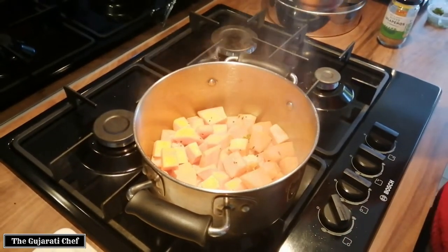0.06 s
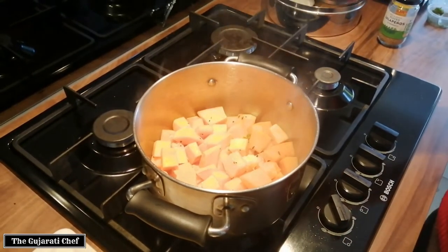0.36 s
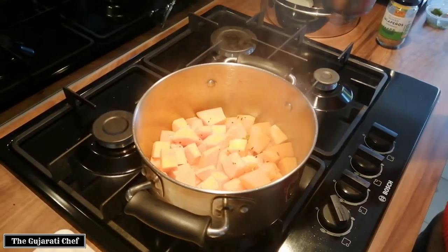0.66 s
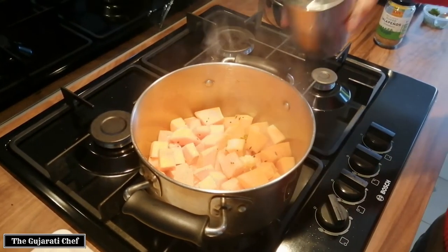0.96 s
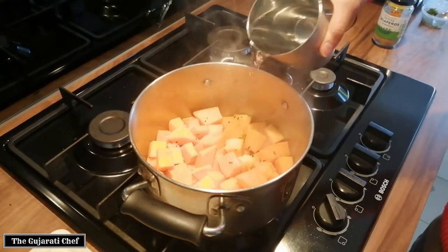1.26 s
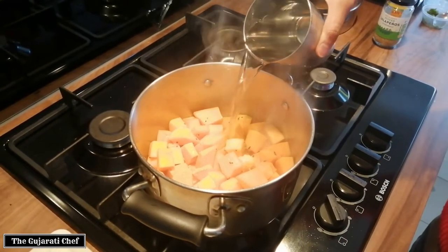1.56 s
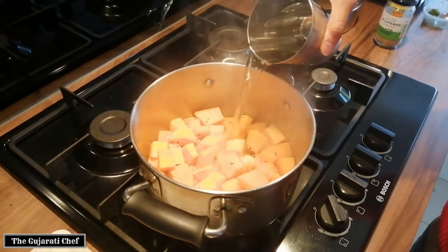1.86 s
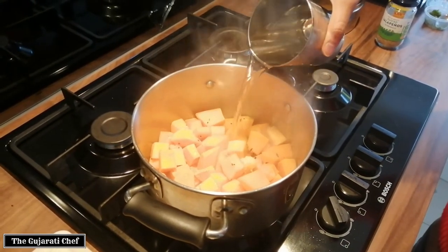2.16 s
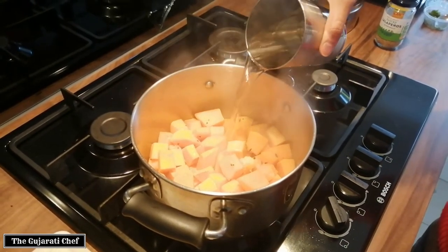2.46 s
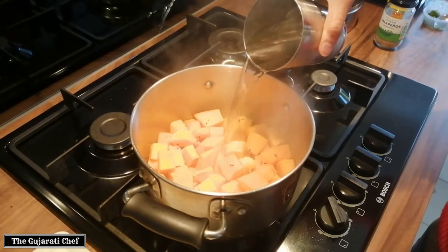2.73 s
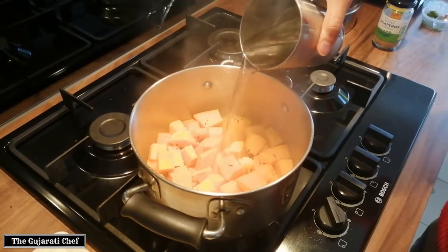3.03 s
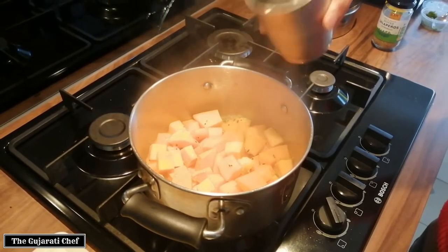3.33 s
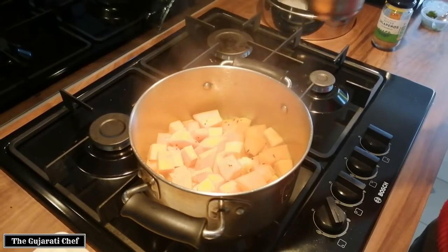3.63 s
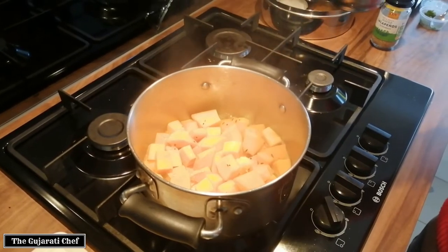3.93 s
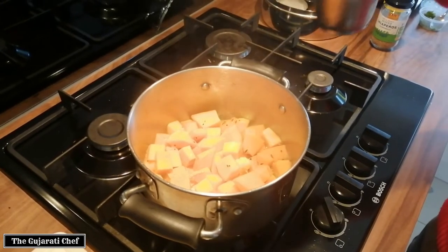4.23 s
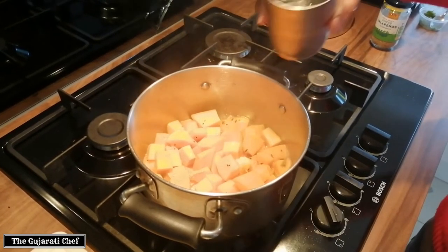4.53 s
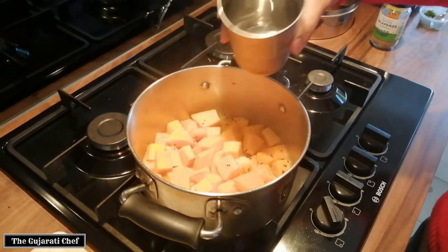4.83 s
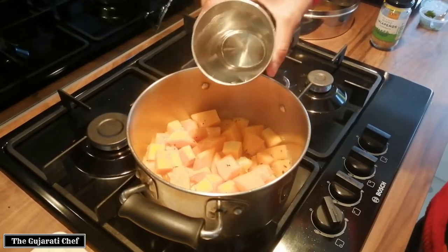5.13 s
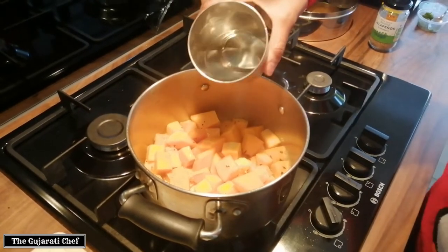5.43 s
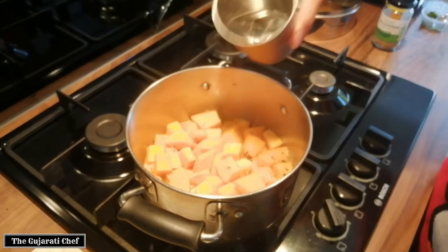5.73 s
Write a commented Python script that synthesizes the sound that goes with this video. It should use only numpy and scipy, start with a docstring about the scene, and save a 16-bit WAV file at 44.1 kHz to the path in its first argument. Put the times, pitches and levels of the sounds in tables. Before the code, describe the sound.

Diced vegetables fry in hot oil in a steel pot, a dense, bright hiss over a lower crackle with spits and sharp pops. As added water cools the oil, the crackle thins and the hiss fades, breaking into short, separate spurts of steam over a soft, hollow simmer. The sound is close and in stereo, from just above the rim, with faint kitchen room tone behind.

```python
"""A kitchen, with a stereo pair of microphones just above the rim of a steel pot on the hob.
Diced vegetables fry in hot oil: countless steam bubbles burst as a dense hiss over a lower crackle,
with spits and sharp pops. Poured water spreads over the base and cools the oil, so the crackle fades
and the hiss gives way to separate spurts. A simmer rings the air in the pot throughout,
and the room murmurs faintly behind it."""
import sys
import numpy as np
from scipy import signal
from scipy.fft import rfft, irfft
from scipy.io import wavfile
from scipy.ndimage import map_coordinates

SR = 44100
rng = np.random.default_rng(int(sys.argv[2]) if len(sys.argv) > 2 else 0)


def generate_wav(signal):
    """Clip the signal to [-1, 1] and save it as 16-bit WAV at the path in sys.argv[1]."""
    frames = np.transpose(np.atleast_2d(signal))
    scaled = np.clip(frames, -1, 1) * 32767
    pcm = np.round(scaled).astype(np.int16)
    wavfile.write(sys.argv[1], SR, pcm)


N = 259440
TIME = np.arange(N) / SR

# Tone of the steam hiss at each microphone: frequency_hz, left_db, right_db
HISS_TONE = [(2640, -50, -41.5), (3760, -20, -24.5), (4390, -10.5, -12), (5040, -10, -2.5),
             (5300, -6.5, 0.5), (6420, -6.5, -3.5), (6500, -7, 1), (6830, 0, -3), (7480, -6.5, -5),
             (7700, -7.5, -17), (8670, -11, -17), (9330, -18, -11), (9900, -12, -12.5),
             (10650, -19.5, -14.5), (12500, -17.5, -15.5), (13600, -24.5, -19), (14700, -16, -8.7),
             (15600, -32, -17)]
# Surges and lulls of the sizzle: start_s, length_s, change_db
SIZZLE_SURGES = [(0.0, 0.37, 1.0), (0.39, 0.2, -0.5), (1.81, 0.28, 1.5), (2.38, 0.19, 1.24),
                 (2.59, 0.14, -1.4), (2.9, .05, -0.5), (3.12, 0.11, 1), (3.242, 0.068, -2),
                 (3.43, 0.056, 0), (3.497, 0.18, -0.9), (3.922, 0.13, -1.5), (4.074, 0.26, 0.6),
                 (4.444, 0.044, -1.5), (4.815, 0.37, -1.5), (4.956, 0.055, -2.5), (5.047, 0.026, -2.5),
                 (5.198, 0.016, -5), (5.408, 0.011, -3), (5.557, 0.056, -3.5), (5.797, 0.13, -2)]
# Tone of the oil crackle: frequency_hz, left_db, right_db
CRACKLE_TONE = [(383, -35.5, -19.5), (532, -2.5, -23), (576, -11.5, -9), (675, 2.5, 2), (753, -5.5, -4),
                (818, -2.5, -2.5), (854, -2.5, -0.5), (950, -19, -8), (985, -9, .5), (1090, -6, -2.5),
                (1170, -8, -0.5), (1366, -3, 5.5), (1384, -4, 5.5), (1520, -6.5, 4.5), (1750, 0.5, -2),
                (1940, -2.5, 5.5), (2120, -1.5, 3), (2240, 0, 2), (2750, 2, 3.5), (2730, -0.5, 0.5),
                (3300, 0, 0.5), (3770, -4, -3.5), (4360, -14, -9), (5900, -21.5, -37.5)]
# Resonances of the air in the pot: pitch_hz, width_hz, left_db, right_db
POT_RESONANCES = [(530, 25, -1, -17), (620, 19, -1.5, -16), (673, 86, 4, -2), (795, 46, -2.5, -2),
                  (858, 19, -0.5, -1), (995, 23, -5.5, -4), (1120, 76, -16, -5), (1630, 130, -6, -13),
                  (2142, 61, 5.5, 5.5), (2546, 67, -4, -3), (2935, 81, -16, -1), (3197, 62, -1, -8),
                  (3560, 33, -12, -24)]
# Tone of a bursting drop, spit or pop: frequency_hz, left_db, right_db
DROP_TONE = [(1500, -23, -42), (3800, -21, -13), (5230, -5, 10), (6600, 1, 1), (8500, -21, 4.5),
             (9940, 5, -11), (12000, -19, -4), (15000, -16, -8)]
# Tone of the room behind the pot: frequency_hz, left_db, right_db
ROOM_TONE = [(25, -22, -13), (49, -7, -3), (67, -10.5, -8), (137, 3.5, 3), (226, -10.5, -8),
             (271, 1.5, 4.5), (308, -5.5, -5.5), (316.5, -0.5, 7), (394, -4.5, -6.5), (474, -19, 0),
             (1160, -6, -3.5), (2880, 0, -9), (3840, -26, -42), (12000, -24, -30)]
# Pops of oil, ahead of DROP_TONE (pan is left minus right): start_s, level_db, pan_db, treble_db
OIL_POPS = [(.1164, -26, -4.5, -2), (.8594, -19, -4, -5), (2.509, -14, -4, -6), (2.534, -14, -6, -6),
            (2.827, -19, -3, -8), (3.226, -24, -4, -8), (3.342, -17, -3, -8), (3.916, -19, 2, -11),
            (3.9554, -26, 2, 4), (3.9834, -16, 3, -5), (4.1644, -19, .5, -5), (4.2173, -18, 5, -14),
            (4.351, -14, 11, -14), (4.4324, -16, 6, -9), (4.799, -20, 13, 1), (4.9194, -25, 5, -5),
            (5.1894, -32, -2, 6), (5.5304, -22, 0, 5), (5.6634, -26, 4, 1), (5.672, -26, 10, 3),
            (5.7044, -23, 4, 2)]
# Spurts of steam where water meets hot metal: peak_s, level_db, pan_db, length_s
STEAM_SPURTS = [(3.877, -37, -2, 0.014), (4.35, -52, 7, 0.028), (4.376, -42, 8, 0.0082),
                (4.418, -35.5, 6, .018), (4.588, -41.5, 6, 0.046), (4.622, -43, -9, .014),
                (4.64, -41, -6, .018), (4.674, -40, -6, .018), (4.765, -41.5, 10, 0.06),
                (4.8, -41, 10, .01), (5.021, -44, -7, 0.024), (5.101, -39.5, -10, .028),
                (5.143, -51, -3, 0.011), (5.159, -44, -11, 0.011), (5.179, -41, -8, .01),
                (5.225, -50.5, -3, .015), (5.264, -44, 1, .035), (5.308, -44, -5, 0.028),
                (5.339, -35, 0, 0.018), (5.359, -37.5, 10, .008), (5.395, -41.5, 2, .012),
                (5.426, -42, -6, 0.03), (5.456, -40.5, 2, 0.043), (5.484, -43.5, -1, .02),
                (5.524, -37.5, 0, 0.029), (5.595, -48, -8, .012), (5.647, -40, -10, 0.016),
                (5.668, -42, 3, .022), (5.688, -46, 16, .01), (5.737, -42, -5, 0.021),
                (5.759, -36, -1, 0.015), (5.777, -51, 2, 0.011)]

SPREAD_FROM_S, SPREAD_UNTIL_S = 1.88, 3.22  # the water spreads over the base
COOL_AT_S, COOL_S = 4.29, 0.54  # moment of fastest cooling, and its time scale
HISS_BAND_HZ = (4500, 8000)

# Settings that follow the water: hot_oil_db, change_when_wet_db, further_change_when_cooled_db
HISS_DB, HISS_PAN_DB = (-31, 0.74, -16.5), (-1, 2, 0)
FIZZ_DB, SPIT_DB = (-7.5, 0.56, -4), (-17, -2.5, -19)  # both relative to the hiss
SPUTTER_DB = (0.63, 0.6, -0.8)  # depth of the flicker in the hiss
BURST_SPREAD_DB = (1, 0.93, 1.5)  # spread of the steam bubble sizes
CRACKLE_DB = (-44, -2, -14)
SIMMER_DB, CROSS_WAVE_DB = (-53, -3, 4.5), (-53, -1, -0.4)


def undb(db):
    """Decibels to gain."""
    return 10 ** (np.asarray(db) / 20)


def sides(pan_db):
    """Microphone gains for a level difference, left minus right."""
    return undb(np.array([[.5], [-.5]]) * pan_db)


def butter(order, hz, kind="lowpass"):
    """Sections of a Butterworth filter."""
    return signal.butter(order, hz, kind, fs=SR, output="sos")


def resonate(x, hz, width_hz):
    """One resonance with gain 1 at its centre."""
    return signal.lfilter(*signal.iirpeak(hz, hz / width_hz, SR), x)


def unit(x, band_hz):
    """Scale a stereo sound so that its middle has rms 1 within a band."""
    return x / signal.sosfilt(butter(4, band_hz, "bandpass"), x.mean(axis=0)).std()


def colour(x, tone):
    """Causal filter that gives each channel its curve from a tone table."""
    hz, *channels_db = np.transpose(tone)
    log_f = np.log(np.fft.rfftfreq(N, 1 / SR) + 1)
    gain = undb([np.interp(log_f, np.log(hz), db) for db in channels_db])
    roll_off = np.minimum(log_f - np.log(hz[0]), 0)  # 6 dB an octave below the first point
    cepstrum = irfft(np.log(gain) + roll_off, N)
    cepstrum[:, 1:N // 2] *= 2  # fold to minimum phase
    cepstrum[:, N // 2 + 1:] = 0
    return irfft(rfft(x, N) * np.exp(rfft(cepstrum)), N)


def walk(rate_hz):
    """A random drift with a spread of 1 that turns about rate_hz times a second."""
    knots = rng.standard_normal(4096)
    drift = np.interp(TIME * rate_hz, np.arange(len(knots)), knots)
    return drift / drift.std()


def hump(at_s, width_s):
    """A smooth rise to 1 and back."""
    return np.exp(-((TIME - at_s) / width_s) ** 2)


def wetted():
    """Share of the base that the water has reached, 0 to 1."""
    return np.interp(TIME, [SPREAD_FROM_S, SPREAD_UNTIL_S], [0, 1])


def cooled():
    """How far the oil has cooled, 0 to 1 along an S-curve."""
    return 1 / (1 + np.exp((COOL_AT_S - TIME) / COOL_S))


def quenched(hot_db, wet_db, cool_db):
    """A level that shifts as the water spreads, and again as the oil cools."""
    return hot_db + wet_db * wetted() + cool_db * cooled()


def surge_db(edge_s=0.012):
    """The sizzle steps up or down for a moment, holds, and returns."""
    return sum(db * np.clip(np.minimum(TIME - start_s, start_s + length_s - TIME) / edge_s + .5, 0, 1)
               for start_s, length_s, db in SIZZLE_SURGES)


def share_lows(x, hz):
    """Long waves reach both microphones alike, short ones unrelated."""
    likeness = .93 / (1 + (np.fft.rfftfreq(N, 1 / SR) / hz) ** 3)
    mid = irfft(rfft(x[0] + x[1]) * np.sqrt(1 + likeness), N)
    side = irfft(rfft(x[0] - x[1]) * np.sqrt(1 - likeness), N)
    return np.array([mid + side, mid - side]) / 2


def right_later(x, lag_s=.00008):
    """The pot reaches the right microphone a moment after the left."""
    delay = np.exp(-2j * np.pi * np.fft.rfftfreq(N, 1 / SR) * lag_s)
    return np.array([x[0], irfft(rfft(x[1]) * delay, N)])


def bursts(rate_hz, spread_db):
    """Bubbles burst as clicks at random moments: most are small, a few are large."""
    struck = rng.random(N) < rate_hz / SR
    size = undb(spread_db * np.minimum(rng.exponential(size=N), 6))
    return struck * size * rng.choice([-1, 1], N)


def in_pot(rate_hz, spread_db, ring_s, wall_db, shared_hz=1500, spots=6):
    """Bursts at several spots reach the microphones directly and as echoes off the steel wall."""
    t = np.arange(1024) / SR
    echoes = rng.standard_normal((spots, 2, len(t))) * np.exp(-t / ring_s)
    echoes /= np.linalg.norm(echoes, axis=2, keepdims=True)
    direct = np.arange(len(t)) == rng.integers(0, 12, size=(spots, 2, 1))
    spectra = rfft(direct + undb(wall_db) * echoes)
    # over the whole pot the echoes favour no frequency
    paths = irfft(spectra / np.sqrt(np.mean(np.abs(spectra) ** 2, axis=0)))
    at_mics = sum(signal.oaconvolve(bursts(rate_hz / spots, spread_db)[None], path, axes=1)[:, :N]
                  for path in paths)
    return share_lows(at_mics, shared_hz)


def steam_hiss():
    """Tiny steam bubbles burst in sputtering swarms; the finest fizz dies first as the oil cools."""
    bubbles = in_pot(rate_hz=14000, spread_db=quenched(*BURST_SPREAD_DB), ring_s=0.0054,
                     wall_db=-0.5, spots=8)
    hiss = colour(bubbles, HISS_TONE)
    fizz = signal.sosfiltfilt(butter(4, 8500, "highpass"), hiss)
    body = unit(hiss - fizz, HISS_BAND_HZ)
    fizz = unit(fizz, (9000, 15500))
    # while the oil cools fastest, a whistling band takes energy from the broad hiss
    whistle = unit(resonate(body, hz=6830, width_hz=1300), HISS_BAND_HZ)
    share = undb(-23 + 15.5 * hump(at_s=4.06, width_s=0.68))
    body = (body + share * whistle) / np.sqrt(1 + share + share ** 2)
    # the swarms flicker and wander from one side of the pot to the other
    depth_db = quenched(*SPUTTER_DB)
    sputter_db = depth_db * (0.79 * walk(rate_hz=51) + 0.47 * walk(rate_hz=170))
    body = body * undb(-1.04 + sputter_db) * sides(2.0 * depth_db * walk(rate_hz=36))
    fizz = fizz * undb(quenched(*FIZZ_DB) + 0.12 * sputter_db + 0.82 * walk(rate_hz=90)) * sides(2.3)
    follow_water = sides(quenched(*HISS_PAN_DB))
    return (body + fizz) * undb(quenched(*HISS_DB) + surge_db()) * follow_water


def oil_crackle(swell, drowned_db=-11.5, stir_db=-37.0):
    """Larger bubbles crackle in the oil until the water drowns them, the deepest first."""
    bubbles = in_pot(rate_hz=6000, spread_db=2.0, ring_s=0.0084, wall_db=5.0, shared_hz=1250)
    crackle = unit(right_later(colour(bubbles, CRACKLE_TONE)), (2300, 3600))
    deep = signal.sosfiltfilt(butter(2, 2000), crackle)
    crackle = crackle - deep + deep * undb(drowned_db * wetted())
    # a spurt of steam as strong as stir_db stirs up the crackle again in the cooled oil
    stirred = 1 + 2 * np.tanh(swell.mean(axis=0) / undb(stir_db)) * cooled() ** 2
    flutter_db = .7 * walk(rate_hz=40)
    return crackle * stirred * undb(quenched(*CRACKLE_DB) + surge_db() + flutter_db)


def steamed(ringing, rise=.018, waver=0.00694):
    """The pot rings lower in dry air; steam raises the pitch and its swirls make it waver."""
    speed = 1 - rise * (1 - wetted()) + waver * walk(rate_hz=12)
    position = np.cumsum(speed)
    return np.array([map_coordinates(channel, [position], order=1, mode="mirror") for channel in ringing])


def simmer(swell, flicker_db=0.94, surge_share=0.7, stir_db=-31):
    """Bubbling between the vegetables rings the air in the pot, and takes over from the crackle."""
    bubbles = in_pot(rate_hz=4500, spread_db=2.0, ring_s=0.0022, wall_db=-1.0, shared_hz=1450)
    bubbles *= 1 + swell.mean(axis=0) / undb(stir_db)  # each spurt of steam stirs the liquid

    def ring(hz, width_hz):
        """The bubbling moves about, so each resonance flickers on its own."""
        return resonate(bubbles * undb(flicker_db * walk(rate_hz=50)), hz, width_hz)

    air = sum(undb([[left_db], [right_db]]) * ring(hz, width_hz)
              for hz, width_hz, left_db, right_db in POT_RESONANCES)
    air = signal.sosfilt(butter(3, 480, "highpass"), air)  # little radiates below the lowest resonance
    air = unit(right_later(air), (580, 900))
    # the wave that swings across the pot is louder and later at the right microphone
    cross_wave = sides(-14) * ring(hz=1476, width_hz=78)
    cross_wave = unit(right_later(cross_wave, lag_s=.00016), (1350, 1580))
    ringing = air * undb(quenched(*SIMMER_DB)) + cross_wave * undb(quenched(*CROSS_WAVE_DB))
    return steamed(ringing) * undb(surge_share * surge_db())


def oil_spits(cluster_db=3):
    """Small droplets spit in irregular clusters among the hiss."""
    droplets = in_pot(rate_hz=130, spread_db=2.5, ring_s=0.00095, wall_db=2, spots=5)
    spits = signal.sosfilt(butter(2, 7500), colour(droplets, DROP_TONE))
    spits = unit(spits * undb(cluster_db * walk(rate_hz=22)), HISS_BAND_HZ)
    return spits * undb(quenched(*HISS_DB) + surge_db() + quenched(*SPIT_DB))


def kitchen_murmur(level_db=-60.5, dip_db=-4.5):
    """Faint, low room tone behind the pot; its level dips for a while."""
    murmur = colour(share_lows(rng.standard_normal((2, N)), hz=900), ROOM_TONE)
    return unit(murmur, (90, 380)) * undb(level_db + dip_db * hump(at_s=3.08, width_s=0.93))


def oil_pops(rise_s=0.00046, crack_s=0.0013, ring_s=0.011, ring_db=-14):
    """A drop bursts with a short crack, dull or bright, that rattles briefly round the pot."""
    t = np.arange(2048) / SR
    decay = np.exp(-t / crack_s) + undb(ring_db) * np.exp(-t / ring_s)
    envelope = (1 - np.exp(-t / rise_s)) * decay
    envelope /= envelope.max()
    pops = np.zeros((2, N + len(t)))
    for start_s, level_db, pan_db, treble_db in OIL_POPS:
        start = int(start_s * SR)
        noise = rng.standard_normal((2, len(t)))
        dull = signal.sosfiltfilt(butter(4, 8000), noise)
        crack = dull + undb(treble_db) * (noise - dull)
        pops[:, start:start + len(t)] += undb(level_db) * sides(pan_db) * envelope * crack
    return colour(pops[:, :N], DROP_TONE) / 2


def spurt_swell(stutter_db=1.3):
    """Strength of the spurts at each microphone: each flares to a peak and stutters as it vents."""
    swell = np.zeros((2, N))
    for peak_s, level_db, pan_db, length_s in STEAM_SPURTS:
        near = np.abs(TIME - peak_s) < 2 * length_s
        flare = np.exp(-np.abs(2 * (TIME[near] - peak_s) / length_s) ** 1.5)
        swell[:, near] += undb(level_db) * sides(pan_db) * flare
    return swell * undb(stutter_db * walk(rate_hz=400))


def steam_spurts(swell):
    """Pockets of water flash to steam in short puffs."""
    bubbles = in_pot(rate_hz=14000, spread_db=-0.5, ring_s=0.0013, wall_db=-3)
    puff = signal.sosfilt(butter(2, [4700, 9500], "bandpass"), colour(bubbles, HISS_TONE))
    return swell * unit(puff, HISS_BAND_HZ)


def scene():
    """The pot close under the microphones, with the kitchen behind it."""
    swell = spurt_swell()
    bed = steam_hiss() + oil_crackle(swell) + simmer(swell) + oil_spits() + kitchen_murmur()
    return bed + oil_pops() + steam_spurts(swell)


def record(dry, top_hz=15850):
    """The recorder cuts the top steeply."""
    return signal.sosfilt(signal.ellip(12, .1, 80, top_hz, fs=SR, output="sos"), dry)


dry = scene()
out = record(dry)
generate_wav(out)
```